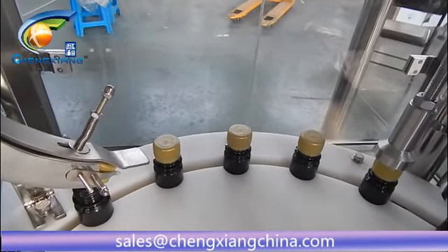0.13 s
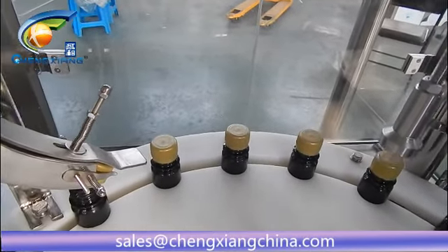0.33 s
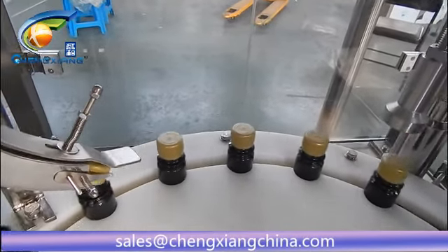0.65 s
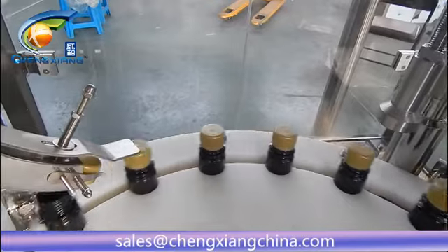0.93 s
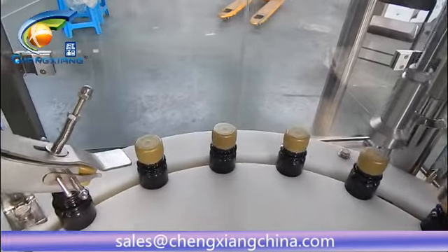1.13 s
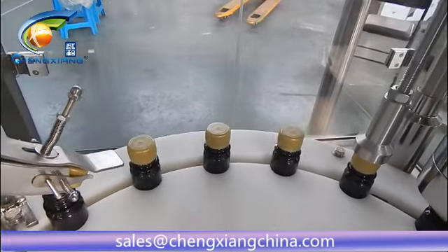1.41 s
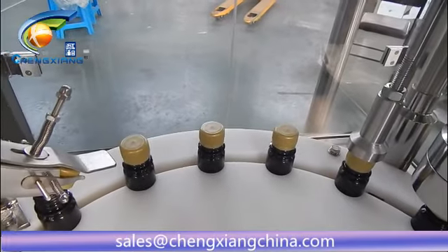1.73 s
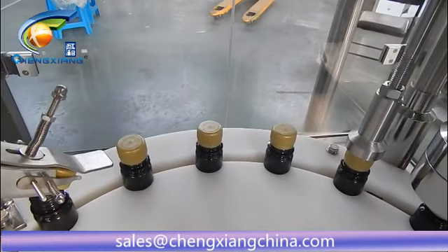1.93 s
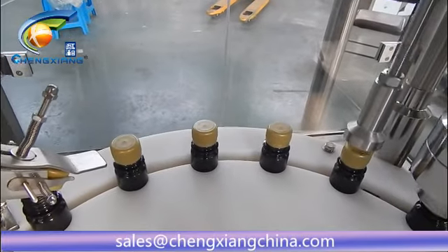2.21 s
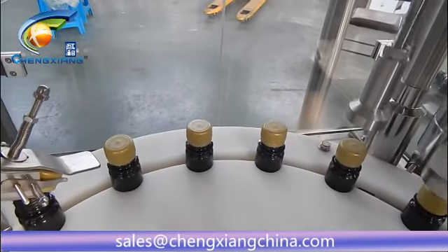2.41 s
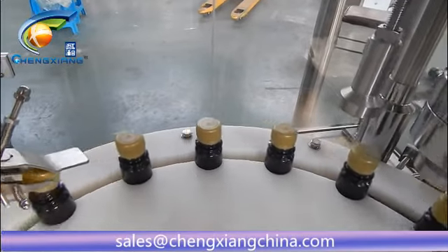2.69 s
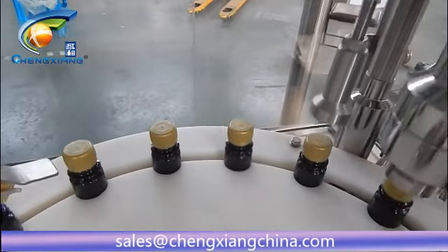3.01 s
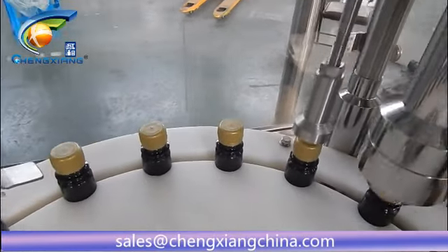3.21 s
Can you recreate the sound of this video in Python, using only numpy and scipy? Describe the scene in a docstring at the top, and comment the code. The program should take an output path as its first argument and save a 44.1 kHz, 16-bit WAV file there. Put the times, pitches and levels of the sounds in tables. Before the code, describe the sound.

A rotary bottle-capping machine indexes twice with sharp air puffs, metal clanks and swelling motor hum.

```python
"""Rotary bottle filler in a hard hall

The filler indexes twice before a microphone pair: motor hum and gear whine (wavering sines) in a wash of
steady machine noise (shaped noise), its level turned down after the strongest air-valve puffs and slowly
raised again, as by a recorder's gain. The puffs are noise under rise-and-fall envelopes; metal clanks and
low thuds are clusters of decaying sines, sent through a short hall tail. A small valve spits once; a faint
squeak comes near the end.
"""
import sys
import numpy as np
from scipy import signal
from scipy.io import wavfile
from scipy.ndimage import uniform_filter1d

SR = 44100
rng = np.random.default_rng(int(sys.argv[2]) if len(sys.argv) > 2 else 0)


def output_pcm(signal):
    """Save a mono or channel-first signal as 16-bit PCM at the path in sys.argv[1].

    Samples are clipped to [-1, 1] before scaling.
    """
    pcm = np.clip(np.atleast_2d(signal).T, -1, 1) * 32767
    wavfile.write(sys.argv[1], SR, np.round(pcm).astype(np.int16))


N = 147735  # length in samples


def amp(db):
    """Turns decibels into a gain."""
    return 10 ** (np.asarray(db) / 20)


def evened(x):
    """Scales a signal to rms 1."""
    return x / np.sqrt(np.mean(x ** 2) + 1e-20)


def read(points, hz):
    """Reads a spectrum table on a log frequency axis."""
    f, value = np.transpose(points)
    return np.interp(np.log(hz + 1), np.log(f + 1), value)


def add(mix, s, sound):
    """Mixes a two-channel sound in at time s, in seconds."""
    part = mix[:, round(s * SR):][:, :sound.shape[1]]
    part += sound[:, :part.shape[1]]


LAG_S = 4.5e-5  # sound reaches the left microphone this much later

# How alike the two microphones hear noise.
# Each row: frequency in Hz, left-right likeness (1 is identical, 0 is unrelated).
LIKENESS = [(60, 1), (240, 0.98), (950, 0.76), (3770, -0.037), (15000, 0.15)]


def noise(gain, size=1024):
    """Noise at the microphone pair, shaped by gain(hz, frames), which gives bins x frames or bins x 1."""
    hz = np.fft.rfftfreq(size, 1 / SR)
    frames = 4 * N // size + 5
    a, b, c, d = rng.standard_normal((frames, len(hz), 4)).T
    right = a + 1j * b
    unrelated = c + 1j * d
    same = np.clip(read(LIKENESS, hz), -1, 1)[:, None]
    lag = np.exp(-2j * np.pi * hz * LAG_S)[:, None]
    left = (same * right + np.sqrt(1 - same ** 2) * unrelated) * lag
    spectrum = np.array([left, right]) * gain(hz, frames)
    sound = signal.istft(spectrum, nperseg=size, noverlap=3 * size // 4)[1]
    return evened(sound[:, :N])


def drift(rate_hz):
    """Slow random wandering of rms 1: white noise low-passed at rate_hz."""
    b, a = signal.butter(2, rate_hz, fs=SR)
    return evened(signal.lfilter(b, a, rng.standard_normal(N)))


def line(hz, waver_hz, waver_db):
    """A sine whose pitch and level wander by the given rms amounts, later at the left microphone."""
    cycles = np.cumsum(hz + waver_hz * drift(12.8)) / SR
    lag_cycles = hz * LAG_S * np.array([[1], [0]])
    tone = np.sqrt(2) * np.sin(2 * np.pi * (cycles - lag_cycles))
    return tone * amp(waver_db * drift(21.5))


PATCH_DB, FLICKER_DB = 2.0, 0.6  # rms level changes

# Colour of the machine wash.
# Each row: frequency in Hz, relative density in dB per Hz.
WASH_SPECTRUM = [(60, -17), (108, -6), (147, -15.5), (194, -10.5), (240, -21.5), (381, -6.5), (560, -16.5),
                 (1300, -18.5), (1800, -16.5), (2300, -16), (2520, -25), (3220, -19.5), (5000, -28),
                 (9200, -27.5), (12000, -28.5), (16000, -41)]


def wash_gain(hz, frames):
    """The wash spectrum with drifting patches and a flicker shared by all frequencies."""
    patches = rng.standard_normal((frames, len(hz))).T
    patches = uniform_filter1d(patches, size=20, axis=0)  # across frequency
    patches = evened(uniform_filter1d(patches, size=6, axis=1))  # across time
    flicker = evened(uniform_filter1d(rng.standard_normal(frames), size=3))
    return amp(read(WASH_SPECTRUM, hz)[:, None] + PATCH_DB * patches + FLICKER_DB * flicker)


TONE_WIDTH_HZ = 11  # half-width where the gain has fallen to 1/e

# Fuzzy tones in the wash. Each entry: centre frequency in Hz.
FUZZY_HZ = [485, 696, 911, 1650, 1782, 2131, 2694]
# Strength of those tones, in the same order. Each entry: relative level in dB.
FUZZY_DB = [0, 0.5, -0.5, 1, 1, -5.5, 0]


def fuzzy_tones():
    """Narrow bands of noise, heard as blurred pitches."""
    def gain(hz, frames):
        """A bell-shaped peak at each tone."""
        peaks = [amp(db) * np.exp(-((hz - f) / TONE_WIDTH_HZ) ** 2) for f, db in zip(FUZZY_HZ, FUZZY_DB)]
        return sum(peaks)[:, None]
    return noise(gain, size=8192)


HALL_T60 = 0.1  # seconds for the tail to fall 60 dB


def hall(x):
    """The hall's decaying random tail, different in each channel, after a 6 ms gap."""
    t = np.arange(SR // 2) / SR
    tail = rng.standard_normal((2, len(t))) * amp(-60 * t / HALL_T60) * (t > .006)
    tail = tail / np.linalg.norm(tail[0])
    return signal.fftconvolve(x, tail, axes=1)[:, :N]


RATTLE_PER_S, RATTLE_SPREAD_DB = 130, 2.5  # mean knock rate, mean of the random boost in dB


def rattle():
    """Loose parts knock at random: band-passed impulses, direct and through the hall."""
    size = amp(RATTLE_SPREAD_DB * rng.exponential(1, N))
    knocks = size * (rng.random(N) < RATTLE_PER_S / SR) * np.ones((2, 1))
    b, a = signal.butter(2, [357, 1970], "band", fs=SR)
    knocks = signal.lfilter(b, a, knocks)
    wet = hall(knocks)
    return evened(knocks + wet + 2 * wet[0])  # one tail also goes to both channels


DRONE_DB, RATTLE_DB = -2.5, 0.5  # against the bass noise, the rattle at the highest level


def rumble(bass, level):
    """Bass noise with a wavering low drone, and a rattle that grows with the level."""
    drone = line(112.1, waver_hz=5.58, waver_db=1.5)
    rattle_level = np.sqrt(level / level.max())
    return evened(bass) + amp(DRONE_DB) * drone + amp(RATTLE_DB) * rattle_level * rattle()


TONES_DB = -7.5  # fuzzy tones against the wash

# Hand-set level of the machine, as a recorder's gain ducks and recovers; straight lines in dB between rows.
# Each row: time in seconds, wash level in dB, then rumble, hum and whine in dB relative to the wash.
MACHINE_LEVEL = [(0, -37, -9, -2, -9.5), (.25, -34, 2, -8, -9), (.5, -27, -2, -13.5, -6),
                 (.75, -24, 1.5, -24, -11), (0.841, -20, -4.5, -16, -10), (0.886, -31.5, -6.5, -11, -7),
                 (1.08, -30.5, -0.5, -8, -15), (1.11, -43, -23, -15, -4), (1.19, -47.5, -4, -13.5, -25),
                 (1.55, -45, -4, -12, -13), (1.8, -41, -3, 0.5, -20), (2.1, -36, -4.5, -4, -20),
                 (2.45, -28.5, -1, -17, -24), (2.7, -24.5, 1, -7, -19), (2.82, -25.5, -2.5, -28, -12),
                 (2.87, -30, -3.5, -35, -17), (3.05, -27, -9.5, -16, -16), (3.09, -41.5, -10, -6, -15),
                 (3.18, -47, -6.5, -20, -28), (3.35, -45, -3.5, -32, -19)]


def machine():
    """Wash, fuzzy tones, rumble, motor hum and gear whine all follow one level curve."""
    s, *columns = np.transpose(MACHINE_LEVEL)
    t = np.arange(N) / SR
    level, rumble_gain, hum_gain, whine_gain = (amp(np.interp(t, s, db)) for db in columns)
    full = noise(wash_gain, size=2048)
    bass = signal.sosfiltfilt(signal.butter(2, 220, fs=SR, output="sos"), full)
    wash = evened(full - bass)
    hum = hum_gain * line(385, waver_hz=2.5, waver_db=2.0)
    whine = whine_gain * line(2357, waver_hz=9, waver_db=4)
    low = rumble_gain * rumble(bass, level)
    return level * (wash + amp(TONES_DB) * fuzzy_tones() + low + hum + whine)


JET_PAN_DB = 3.5  # the jet is this much louder on the left
SNAP_T60 = 0.092  # seconds for a snap to fall 60 dB
ROAR_LINGERS = 1.26  # the roar falls this many times slower than the jet

# Puffs from the air valves.
# Each row: peak time in seconds, jet level in dB rms, snap in dB above the jet, lead-in in seconds
# per 20 dB of rise, hold in seconds, 60 dB fall time of the jet in seconds, roar in dB above the jet.
VALVE_PUFFS = [(0.108, -40, -23, 0.0075, .01, 0.35, 6.5), (0.519, -40.5, -12, 0.12, 0.015, 0.066, 12.5),
               (0.754, -26.5, -7, 0.03, 0.023, 0.26, 6), (0.844, -25, -3.5, 0.0072, 0.0067, 0.19, 1.5),
               (0.975, -33.5, -19, 0.068, 0.028, 0.069, 6), (1.091, -27, 3.5, 0.016, 0.018, 0.16, 3),
               (2.728, -37.5, 10, .006, 0.077, 0.054, 11), (2.811, -22.5, -26, 0.0022, 0.03, 0.1, -1.5),
               (3.063, -24, 1.5, 0.03, 0.014, 0.17, 3.5)]
# Colour of the whistling jet. Each row: frequency in Hz, relative density in dB per Hz.
JET_SPECTRUM = [(5000, -4), (9500, 5), (10200, 6.5), (10650, 11), (11200, 5.5), (14000, -1.5), (16000, -22)]
# Colour of the lower roar. Each row: frequency in Hz, relative density in dB per Hz.
ROAR_SPECTRUM = [(500, -21.5), (1500, -12.5), (1850, -5), (2400, -12), (4000, -18), (16000, -27)]


def valves():
    """Each puff is a whistling jet and a lower roar: lead-in, a snap as the valve opens, hold, fall."""
    jet = noise(lambda hz, frames: amp(read(JET_SPECTRUM, hz))[:, None])
    jet = jet * amp([[JET_PAN_DB / 2], [-JET_PAN_DB / 2]])
    roar = noise(lambda hz, frames: amp(read(ROAR_SPECTRUM, hz))[:, None])
    t = np.arange(N) / SR
    out = np.zeros((2, N))
    for s, db, snap_db, lead, hold, t60, roar_db in VALVE_PUFFS:
        rise = amp(db - 20 * np.maximum(s - t, 0) / lead)
        fall_db = -60 * np.maximum(t - s - hold, 0) / t60
        snap = (t > s) * amp(db + snap_db - 60 * abs(t - s) / SNAP_T60)
        puff = amp(fall_db) * jet + amp(roar_db + fall_db / ROAR_LINGERS) * roar
        out += rise * puff + snap * jet
    return out


def struck(modes, db, hz, t60, blow):
    """A blow sets a cluster of modes ringing; blow is its onset time constant in seconds."""
    t = np.arange(round(.3 * SR)) / SR
    ring = sum(amp(level_db) * np.sin(2 * np.pi * hz * ratio * t) for ratio, level_db in modes)
    ring = ring * amp(-60 * t / t60) * (1 - np.exp(-t / blow))
    return amp(db) * ring / abs(ring).max() * np.ones((2, 1))


# Metal clanks, the first blow 1 ms after the listed time.
# Each row: time in seconds, direct peak of the first blow in dB, pitch in Hz.
METAL_CLANKS = [(0.1198, -23.5, 1676), (0.522, -8.5, 2210), (0.84, -18, 1290), (0.987, -14, 1843),
                (1.0895, -19, 2050), (1.3854, -31.5, 2096), (2.1964, -23.5, 1920), (2.4996, -8, 2188),
                (2.811, -9.5, 1872), (2.947, -27, 1850), (3.078, -29, 1820)]
# Modes of the ringing metal. Each row: ratio to the clank's pitch, relative level in dB.
METAL_MODES = [(.86, -18), (.93, -7), (1.0, 4), (1.06, -21), (1.27, -10), (.22, -2.5)]
# The part lands again. Each row: delay after the listed time in seconds, level in dB against the first blow.
LANDINGS = [(.0082, -1.5), (0.026, -11.5)]


def clanks():
    """Metal parts hit, ring briefly and land again more softly."""
    hits = np.zeros((2, N))
    for s, db, hz in METAL_CLANKS:
        for later, softer_db in [(0.001, 0)] + LANDINGS:
            add(hits, s + later, struck(METAL_MODES, db + softer_db, hz, t60=0.034, blow=0.00038))
    return hits


# Low thuds of the machine.
# Each row: start in seconds, direct peak in dB, pitch in Hz.
LOW_THUDS = [(0.379, -15.5, 281.5), (0.491, -21, 375), (0.605, -12.5, 490), (0.755, -12, 296.6),
             (0.812, -18.5, 160.5), (1.087, -27, 664), (1.387, -38.5, 483), (2.359, -21.5, 358),
             (2.58, -17.5, 477)]
# Modes of a thud. Each row: ratio to the thud's pitch, relative level in dB.
THUD_MODES = [(1.0, -2.5), (1.25, -9.5), (1.7, -9)]


def thuds():
    """Low blows: fewer, lower modes with a longer ring than the clanks."""
    hits = np.zeros((2, N))
    for s, db, hz in LOW_THUDS:
        add(hits, s, struck(THUD_MODES, db, hz, t60=0.12, blow=0.00044))
    return hits


# A small valve spits once.
# The one row: start in seconds, snap level in dB, its 60 dB fall time in seconds,
# hiss level in dB, its 60 dB fall time in seconds.
SMALL_SPIT = (1.483, -29, .05, -32, .22)


def spit():
    """A small valve's air: a bright narrow snap and a wider hiss, both decaying noise bands."""
    s, snap_db, snap_t60, hiss_db, hiss_t60 = SMALL_SPIT
    t = np.maximum(np.arange(N) / SR - s, 0)
    air = noise(lambda hz, frames: np.ones((len(hz), 1)))

    def band(low_hz, high_hz):
        """One band of the air noise at rms 1."""
        b, a = signal.butter(2, [low_hz, high_hz], "band", fs=SR)
        return evened(signal.lfilter(b, a, air))

    snap = amp(snap_db - 60 * t / snap_t60) * band(10300, 12000)
    hiss = amp(hiss_db - 60 * t / hiss_t60) * band(8500, 15000)
    onset = 1 - np.exp(-t / 0.00074)
    return onset * (snap + hiss)


# A faint squeak.
# The one row: start in seconds, length in seconds, pitch in Hz, level in dB rms at its middle.
FAINT_SQUEAK = (3.195, .08, 3990, -57.5)


def squeak():
    """A short thin tone, wavering in pitch and level under a rounded envelope."""
    s, length, hz, db = FAINT_SQUEAK
    progress = np.clip((np.arange(N) / SR - s) / length, 0, 1)
    envelope = np.sin(np.pi * progress) ** .5
    return amp(db) * line(hz, waver_hz=10.3, waver_db=3) * envelope


HALL_DB = -5  # gain of the hall tail on the hits


def scene():
    """The machine and its valves, the hits with their hall tail, the spit and the squeak."""
    hits = clanks() + thuds()
    return machine() + valves() + hits + amp(HALL_DB) * hall(hits) + spit() + squeak()


def record(dry):
    """The microphone's bass cut below 56 Hz, then a steep band limit at 15.8 kHz."""
    cut = signal.sosfilt(signal.butter(4, 56, "high", fs=SR, output="sos"), dry)
    band_limit = signal.firwin(511, 15800, window=("kaiser", 9), fs=SR)
    return signal.oaconvolve(cut, band_limit[None], "same")


dry = scene()
out = record(dry)
output_pcm(out)
```